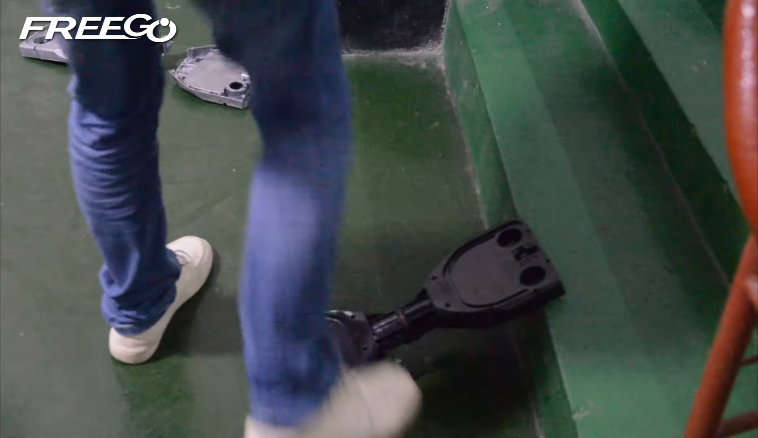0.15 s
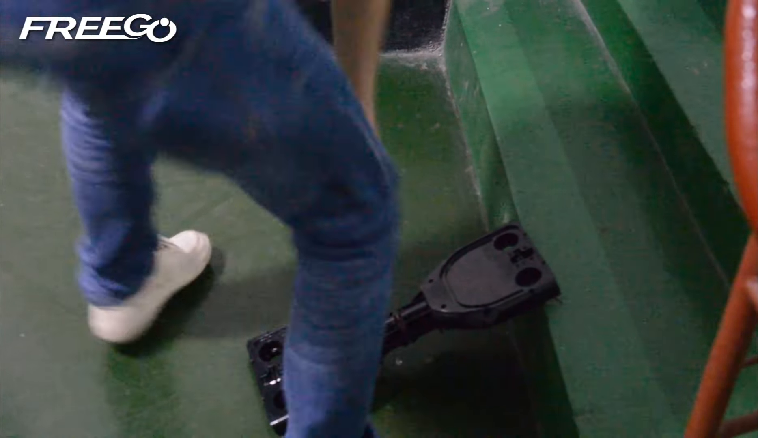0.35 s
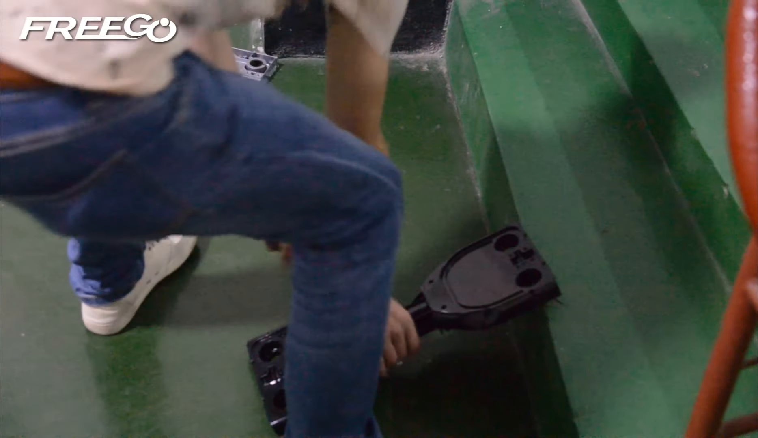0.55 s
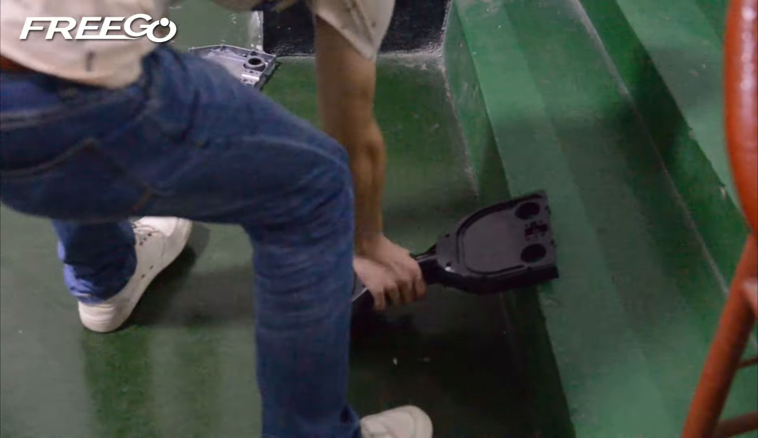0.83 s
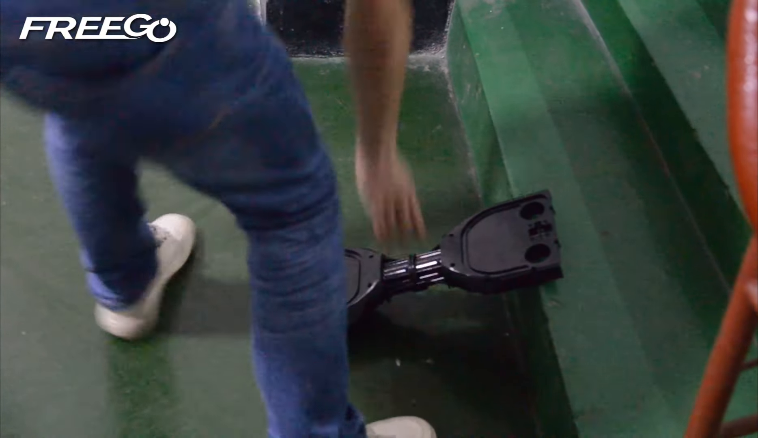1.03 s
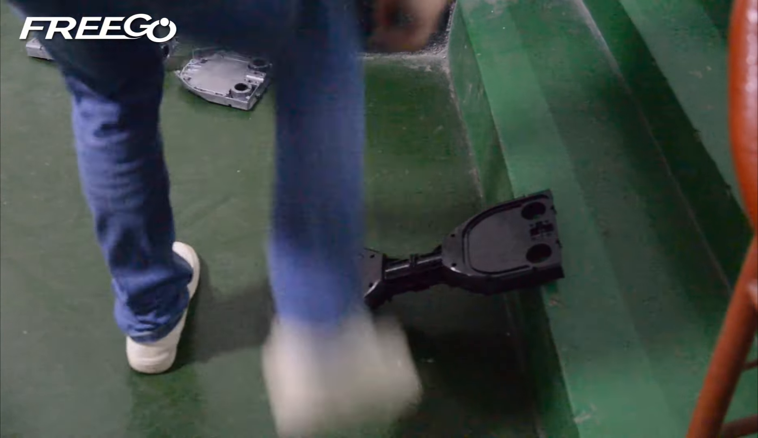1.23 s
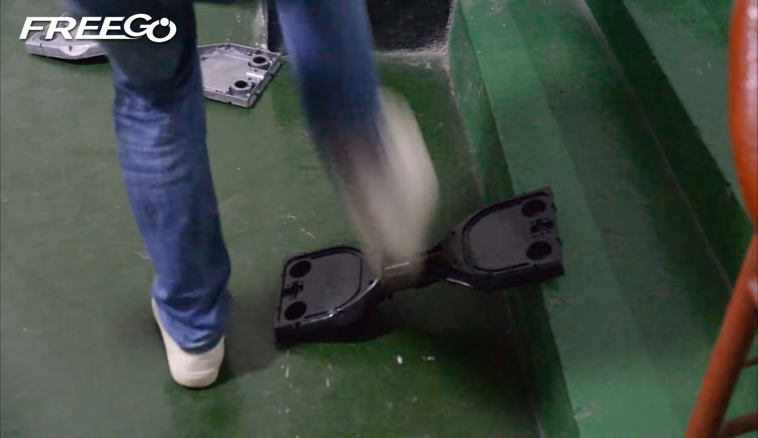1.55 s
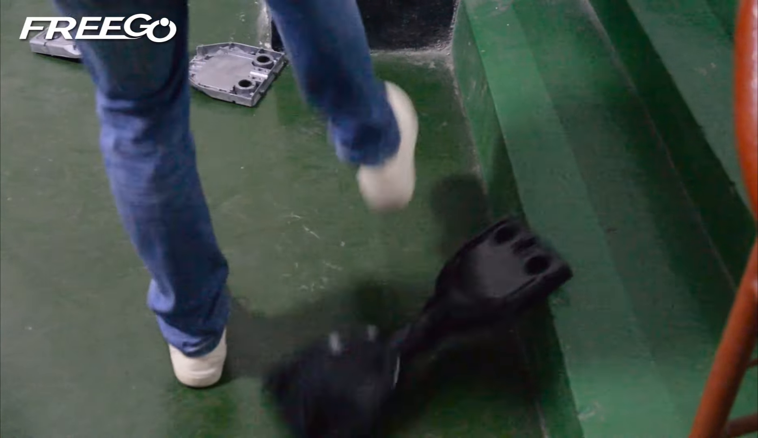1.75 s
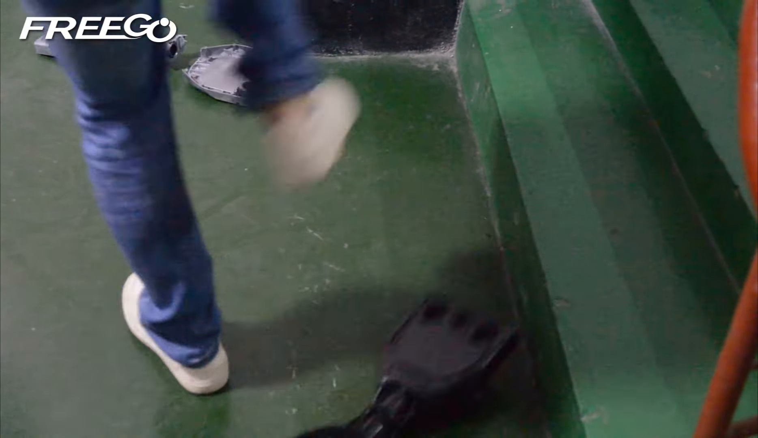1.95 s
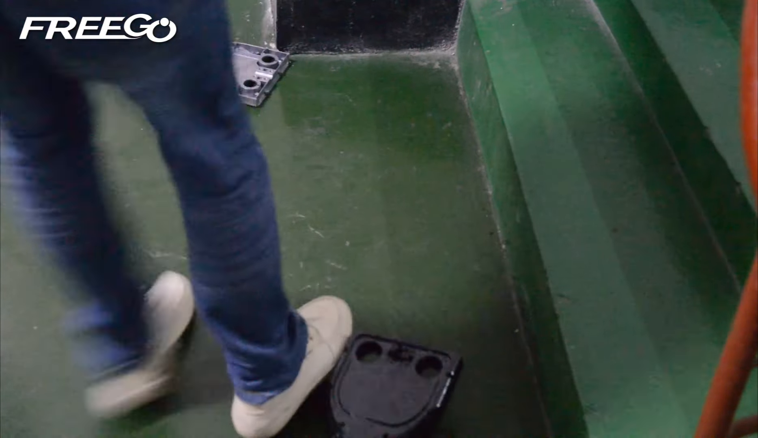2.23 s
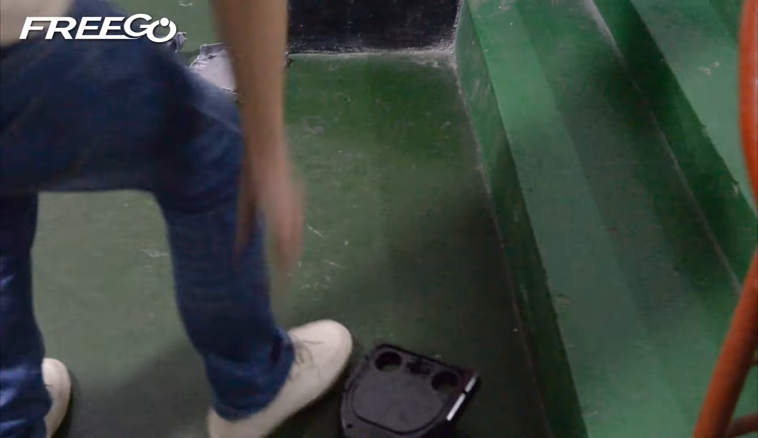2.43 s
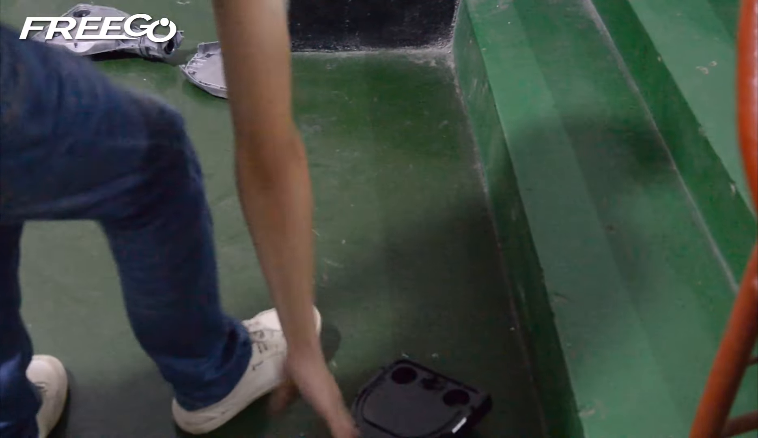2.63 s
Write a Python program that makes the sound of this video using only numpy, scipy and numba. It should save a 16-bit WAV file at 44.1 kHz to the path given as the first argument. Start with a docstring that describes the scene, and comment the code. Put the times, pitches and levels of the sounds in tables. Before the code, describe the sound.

A shoe stamps and kicks a metal scooter frame, clanging and clattering in an echoing hall

```python
"""Low hum and a ring still fading in a hard, echoing hall; then a shoe stamps on a cast metal scooter frame
wedged against a step. The frame clangs (decaying sines), chatters, is kicked loose and clatters over the
floor (noise bursts); the shoe lands (dulled bursts) and scuffs (noise swells). The hall is a convolution.
A close microphone turns its gain down at loud blows, cuts sustained loud bass and clips the peaks."""
import sys
import numpy as np
from scipy import signal
from scipy.fft import rfft, irfft
from scipy.io import wavfile
from scipy.ndimage import uniform_filter1d
from numba import njit

SR = 44100
rng = np.random.default_rng(int(sys.argv[2]) if len(sys.argv) > 2 else 0)


def put_to_file(sound):
    """Save the sound as 16-bit audio at rate SR, in the file named by the first command-line argument."""
    columns = np.atleast_2d(sound).T  # one column per channel
    safe = np.clip(columns, -1, 1)
    whole_steps = np.round(safe * 32767)
    wavfile.write(sys.argv[1], SR, whole_steps.astype(np.int16))


N = 121275
T = np.arange(N) / SR
BURST_N = N // 5  # samples in one decaying sound

# room air: hz, density_db
AIR_SPECTRUM = [(25, -29), (60, 5.5), (120, 1.5), (300, 2), (700, -3), (2000, -4.5), (6000, -16.5),
                (15000, -31)]
# machine hum: hz, level_db
HUM_TONES = [(56, -42.5), (187, -45)]
# hall reverberation: hz, t60_s
HALL_DECAY = [(100, 1.2), (500, 1.7), (1000, 1.985), (2000, 1.59), (4000, 1.46), (7000, 1.09),
              (10000, 0.74), (15000, 0.28)]
# scuffs of shoe and jeans: start_s, length_s, swish_db, shuffle_db
SCUFF_SWELLS = [(-.1, .3, -51.5, -30.5), (0.095, 0.41, -32, -29.5), (0.808, 0.39, -32, -28),
                (2.224, 0.38, -36.5, -34.5), (2.364, .5, -41, -31.5)]
# bright rubbing: hz, density_db
SWISH_SPECTRUM = [(1000, 0), (2300, 5), (3500, 10.5), (5000, -1), (10000, 0), (15000, -21.5)]
# low rubbing: hz, density_db
SHUFFLE_SPECTRUM = [(40, -36), (110, -18), (280, 0), (500, -1), (900, -4), (2500, -32)]
# shoe contacts with the floor: start_s, level_db (before dulling), brightness_hz
SHOE_CONTACTS = [(1.007, -15, 2500), (1.009, -4.5, 342), (1.013, -5, 11060), (1.047, -7, 4040),
                 (2.408, -28, 11000)]
# sole slap: hz, density_db
SOLE_SPECTRUM = [(40, -30), (120, -16.5), (250, -5), (420, -12), (700, 5.5), (1150, -3), (2100, 1.5),
                 (3300, -11.5), (7000, -11), (15000, -18.5)]
# main modes of the frame: hz (unstrained), level_db, t60_s, pitch_rise_percent (at strain 1)
FRAME_MODES = [(888.5, -5, 0.057, 0), (945.5, 1, 0.2, -1.5), (988.2, 6.5, 0.1, 2),
               (1004.4, -6.5, 0.19, 3.5), (1006, 4.5, 0.21, 6), (1938, -2, 0.41, 4.5),
               (2008, -4.5, 0.47, 2), (2774, 1, 0.1, 0.6), (2830, 0.5, 0.13, 0), (3020, -2, 0.22, 4.5),
               (3500, -0.5, 0.12, 1), (4020, -14, 0.22, 2), (4250, -11, 0.27, -1), (4720, -9, 0.14, -3.5),
               (5040, -6.5, 0.22, 1.5), (5945, -10.5, 0.3, 9), (6190, -8, 0.23, 0),
               (6720, -3.5, 0.21, -1.5), (7173, -4.5, 0.31, 0.5), (7887, -18.5, 0.18, -11),
               (9200, -14, .7, 0), (11100, -27, 0.69, -1)]
# the casting's many weak modes: hz, level_db
SHIMMER_SPECTRUM = [(1400, -30), (2500, -31.5), (4000, -24), (7000, 2.5), (9500, 0.5), (15000, -10)]
# clatter of frame on floor and step: hz, density_db
CLATTER_SPECTRUM = [(40, -70), (150, -48), (300, -5.5), (550, -13), (900, 8.5), (1300, -7), (1800, 4.5),
                    (2400, -1.5), (4000, -2), (7000, -7), (10000, -13), (15000, -12.5)]
# knocks on the frame: start_s, level_db (before dulling), ring_to_clatter_db, brightness_hz,
# strain (0-1), accent_hz, crack_db
FRAME_KNOCKS = [(.241, 5.5, 2.5, 11800, 0.1, 2500, 7), (.268, -3, -5.5, 9100, 0.23, 1900, -7),
                (.425, -4.5, 5.5, 7560, 0.02, 1000, -2), (1.056, -9, 8, 2000, 0.97, 1060, -22),
                (1.156, -10.5, 4, 2830, 0.94, 1940, -2), (1.253, -10, -0.5, 6150, 1, 2690, 4),
                (1.362, -4, 5, 2545, 0.89, 1900, -0.5), (1.376, -4, -3, 11700, 0.92, 1800, -0.5),
                (1.428, 0.5, 7, 9200, .5, 980, 6), (1.464, -4.5, 4, 6730, 0.3, 960, -10),
                (1.597, -13.5, -6, 7270, 1, 1015, 2), (1.673, -12, 4, 7460, 0.7, 990, 1.5),
                (2.056, -14, 0.5, 4630, 0.5, 990, -6.5), (2.124, -20.5, -1.5, 2500, 0.59, 1070, -2.5),
                (2.314, -17.5, 2, 1150, .3, 1010, -9.5), (2.354, -28, -4, 1300, 0.67, 1010, 1),
                (2.412, -21.5, 10.5, 5000, 0.19, 982, 1)]

AIR_DB, HUM_WAVER_DB = -32.5, 3.5
HALL_DB, HALL_BUILD_S, EARLY_DB, EARLY_S = 0.5, 0.00667, -6.5, 0.025
SOLE_T60_S = 0.097
SHIMMER_DB, SHIMMER_T60_S = -9.5, 0.19
CLATTER_T60_S, CRACK_DECAY_S = 0.07, 0.0053  # crack: time to fall to 1/e
CRACK_DB = -3  # of the chatter and the earlier blow
SCATTER_DB = 2  # spread of mode levels from blow to blow
ACCENT_DB, ACCENT_Q = 5.5, 3.38  # the place struck favours one part of the spectrum
EARLIER_AGO_S, EARLIER_DB = 0.36, -5.5
CHATTER_S, CHATTER_LENGTH_S, CHATTER_DB, CHATTER_HZ = 0.3, 0.16, -5, 7640
LIMIT_DB, ATTACK_S, RELEASE_S, RATIO = -11, 0.017, 0.35, 4.3
LOW_CUT_HZ, LOW_CUT_ABOVE_DB, LOW_CUT_KNEE_DB, LOW_CUT_DEPTH_DB = 265, -11.5, 1.8, -26.5
LOW_CUT_ATTACK_S, LOW_CUT_RELEASE_S = 0.071, 0.08
TOP_HZ = 15600


def amp(db):
    """Decibels to gain."""
    return 10 ** (np.asarray(db) / 20)


def at(points, hz):
    """Read a table on a log-frequency axis."""
    table_hz, values = np.array(points).T
    return np.interp(np.log(hz + 1e-3), np.log(table_hz), values)


def unit(x):
    """Scale to unit energy."""
    return x / np.sqrt(np.sum(x ** 2))


def noise(points, size=N):
    """Gaussian noise with a tabled spectrum, rms 1."""
    spectrum = rfft(rng.standard_normal(size))
    gain = amp(at(points, np.fft.rfftfreq(size, 1 / SR)))
    return unit(irfft(spectrum * gain, size)) * np.sqrt(size)


def walk(rate_hz):
    """Slow random drift with a spread near 1: twice-smoothed random steps."""
    k = int(SR / rate_hz)
    steps = np.repeat(rng.standard_normal(N // k + 1), k)
    return 1.3 * uniform_filter1d(uniform_filter1d(steps, k), k)[:N]


def fade(t60_s):
    """Exponential decay, falling 60 dB in t60_s."""
    return np.exp(-np.log(1000) * T[:BURST_N] / t60_s)


def burst(points, t60_s):
    """Dying burst of coloured noise, unit energy."""
    return unit(noise(points, BURST_N) * fade(t60_s))


def partials(rows):
    """Decaying sines, one for each row of hz, level_db, t60_s."""
    t = T[:BURST_N]
    return np.array([amp(db) * np.sin(2 * np.pi * hz * t) * fade(t60_s) for hz, db, t60_s in rows])


def contact(x, level_db, brightness_hz):
    """Low-pass for a softer contact; level is the input energy spread over a twentieth of a second."""
    b, a = signal.butter(2, brightness_hz, fs=SR)
    return signal.lfilter(b, a, x) * amp(level_db) * np.sqrt(SR / 20)


def add(out, x, start_s):
    """Mix a sound in at a time."""
    i = max(int(start_s * SR), 0)
    out[i:i + len(x)] += x[:len(out) - i]


def background():
    """Room air as coloured noise; machine hum as sines wavering in level and phase."""
    hum = np.zeros(N)
    for hz, db in HUM_TONES:
        level = amp(db + HUM_WAVER_DB * walk(3.13)) * np.sqrt(2)
        hum += level * np.sin(2 * np.pi * hz * T + 0.5 * walk(9.44))
    return amp(AIR_DB) * noise(AIR_SPECTRUM) + hum


def hall():
    """Impulse response: direct sound, reflections from floor and steps, and a long tail that dulls."""
    f_hz = np.fft.rfftfreq(N, 1 / SR)
    white = rfft(rng.standard_normal(N))
    centres_hz = np.geomspace(100, 16000, 14)
    tail = np.zeros(N)
    # overlapping triangular bands, each with its own decay
    for hz, peak in zip(centres_hz, np.eye(len(centres_hz))):
        band = irfft(white * np.interp(f_hz, centres_hz, peak), N)
        tail += band * amp(-60 * T / at(HALL_DECAY, hz))
    tail *= (1 - np.exp(-T / HALL_BUILD_S)) * np.sqrt(10 / SR)
    # cubing makes the reflections sparse
    early = unit(rng.standard_normal(N) ** 3 * np.exp(-T / EARLY_S) * (T > 0.003))
    return (T == 0) + amp(EARLY_DB) * early + amp(HALL_DB) * tail


def scuffs(grain_db=3):
    """Sole and denim rubbing: half-sine swells of grainy swish and smooth shuffle noise."""
    swish = noise(SWISH_SPECTRUM) * amp(grain_db * walk(250))
    shuffle = noise(SHUFFLE_SPECTRUM)
    out = np.zeros(N)
    for start_s, length_s, swish_db, shuffle_db in SCUFF_SWELLS:
        swell = np.sin(np.pi * np.clip((T - start_s) / length_s, 0, 1))
        out += swell * (amp(swish_db) * swish + amp(shuffle_db) * shuffle)
    return out


def shoe():
    """The rubber sole slaps the floor: short noise bursts."""
    out = np.zeros(N)
    for start_s, level_db, brightness_hz in SHOE_CONTACTS:
        add(out, contact(burst(SOLE_SPECTRUM, SOLE_T60_S), level_db, brightness_hz), start_s)
    return out


def strike(waves):
    """Every blow mixes the modes with random level and sign; unit energy."""
    size, side = rng.standard_normal((len(waves), 2)).T
    return unit((amp(SCATTER_DB * size) * np.sign(side)) @ waves)


def clang(ring_db, strain, accent_hz, crack_db, shimmer):
    """One blow: crack, clatter, strain-shifted modes and shimmer, coloured by the place struck."""
    modes = partials([(hz * (1 + strain * rise_percent / 100), db, t60_s)
                      for hz, db, t60_s, rise_percent in FRAME_MODES])
    clatter = burst(CLATTER_SPECTRUM, CLATTER_T60_S)
    crack = burst(CLATTER_SPECTRUM, CRACK_DECAY_S * np.log(1000))
    x = clatter + amp(crack_db) * crack
    x = x + amp(ring_db) * strike(modes) + amp(SHIMMER_DB) * strike(shimmer)
    b, a = signal.iirpeak(accent_hz, ACCENT_Q, fs=SR)
    return unit(x + (amp(ACCENT_DB) - 1) * signal.lfilter(b, a, x))


def shimmer_modes(count=200):
    """The casting's weak modes: unevenly spaced decaying sines."""
    modes_hz = np.linspace(SHIMMER_SPECTRUM[0][0], 12000, count) + 15 * rng.standard_normal(count)
    return partials([(hz, at(SHIMMER_SPECTRUM, hz), SHIMMER_T60_S) for hz in modes_hz])


def earlier_blow(shimmer):
    """An earlier blow on the frame, whose ring still hangs in the hall."""
    out = np.zeros(N)
    blow = clang(ring_db=1.5, strain=0, accent_hz=1750, crack_db=CRACK_DB, shimmer=shimmer)
    add(out, contact(blow, EARLIER_DB, brightness_hz=2500), 0)
    return out


def chatter(shimmer, count=12):
    """Stamped frame against the step: quick uneven contacts while the shoe bears down."""
    out = np.zeros(N)
    for k, (late, size) in enumerate(rng.random((count, 2))):
        blow = clang(ring_db=-0.5, strain=0, accent_hz=1900, crack_db=CRACK_DB, shimmer=shimmer)
        start_s = CHATTER_S + CHATTER_LENGTH_S * (k + late) / count
        add(out, contact(blow, CHATTER_DB + 4 * (size - 0.5), CHATTER_HZ), start_s)
    return out


def frame(shimmer):
    """All knocks on the frame, each exciting its modes, plus the chatter."""
    out = np.zeros(N)
    for start_s, level_db, ring_db, brightness_hz, strain, accent_hz, crack_db in FRAME_KNOCKS:
        blow = clang(ring_db, strain, accent_hz, crack_db, shimmer)
        add(out, contact(blow, level_db, brightness_hz), start_s)
    return out + chatter(shimmer)


def scene():
    """Frame and shoe sound in the hall; scuffs and background are added without its reverberation."""
    room = hall()
    shimmer = shimmer_modes()
    impacts = signal.fftconvolve(frame(shimmer) + shoe(), room)[:N]
    # skip the part already past
    lingering = signal.fftconvolve(earlier_blow(shimmer), room)[int(EARLIER_AGO_S * SR):][:N]
    return (impacts + lingering + scuffs() + background())[None]


@njit
def follow(x, attack, release):
    """Level follower: one-pole smoothing with separate rise and fall rates per sample."""
    out, e = np.empty(len(x)), 0.
    for i in range(len(x)):
        e += (x[i] - e) * (attack if x[i] > e else release)
        out[i] = e
    return out


def record(dry):
    """Gain ducks after loud blows, bass is cut while it stays loud, peaks clip, the top is cut."""
    level = follow(np.abs(dry[0]), 1 / (ATTACK_S * SR), 1 / (RELEASE_S * SR))
    x = dry * np.maximum(level / amp(LIMIT_DB), 1) ** (1 / RATIO - 1)
    loudness = follow(np.minimum(np.abs(x[0]), 1), 1 / (LOW_CUT_ATTACK_S * SR), 1 / (LOW_CUT_RELEASE_S * SR))
    loud_db = 20 * np.log10(loudness + 1e-9)
    # 0: bass passes, 1: full cut
    closed = (1 + np.tanh((loud_db - LOW_CUT_ABOVE_DB) / LOW_CUT_KNEE_DB / 2)) / 2
    bass = signal.sosfiltfilt(signal.butter(2, LOW_CUT_HZ, fs=SR, output="sos"), x)
    x = np.clip(x - bass * (1 - amp(LOW_CUT_DEPTH_DB * closed)), -1, 1)
    return signal.sosfilt(signal.ellip(10, 0.1, 80, TOP_HZ, fs=SR, output="sos"), x)


dry = scene()
out = record(dry)
put_to_file(out)
```